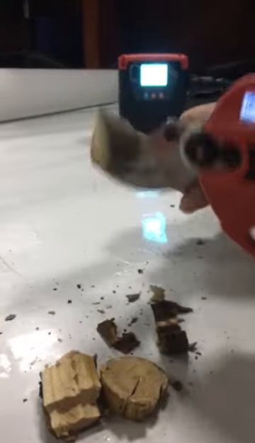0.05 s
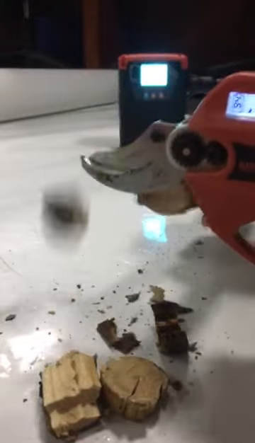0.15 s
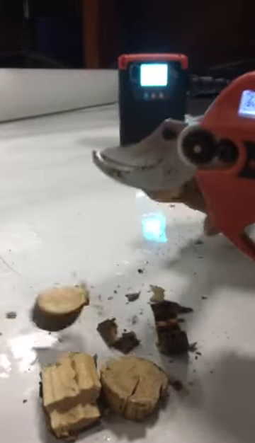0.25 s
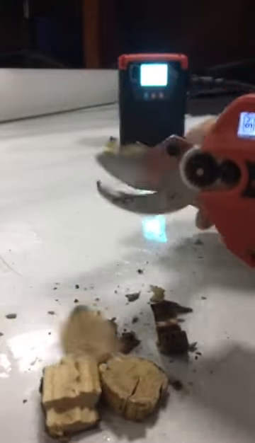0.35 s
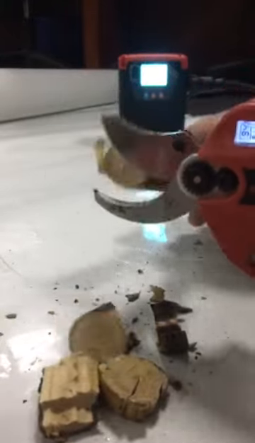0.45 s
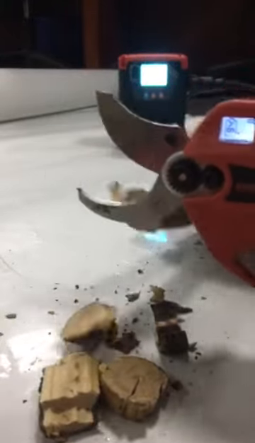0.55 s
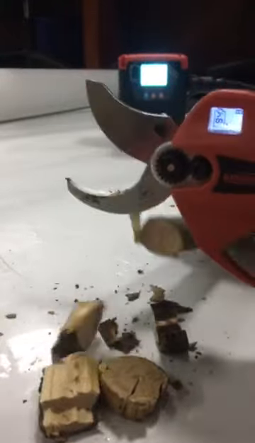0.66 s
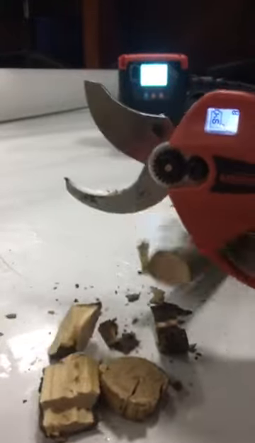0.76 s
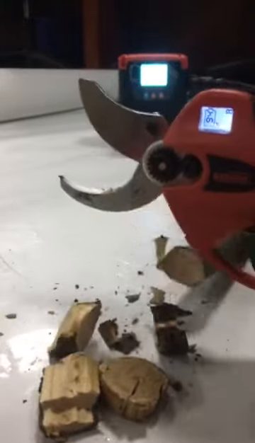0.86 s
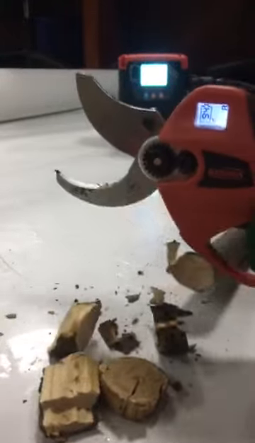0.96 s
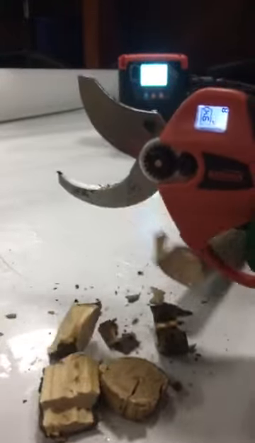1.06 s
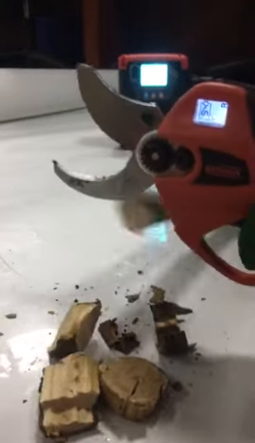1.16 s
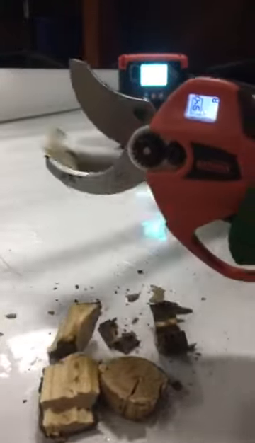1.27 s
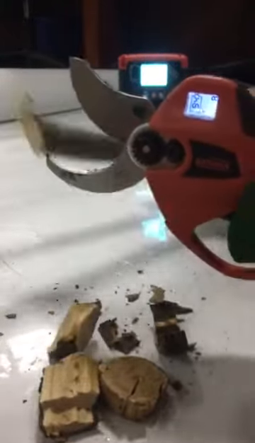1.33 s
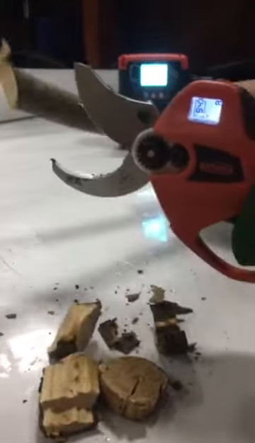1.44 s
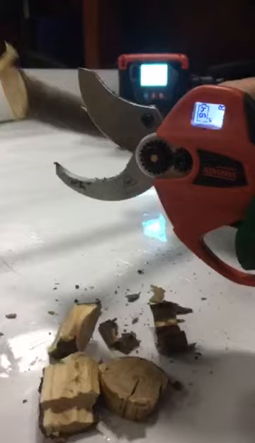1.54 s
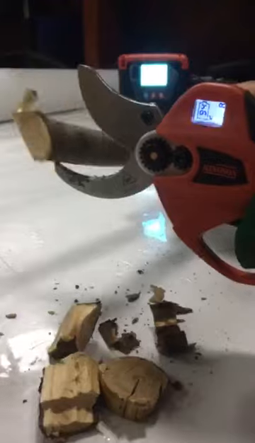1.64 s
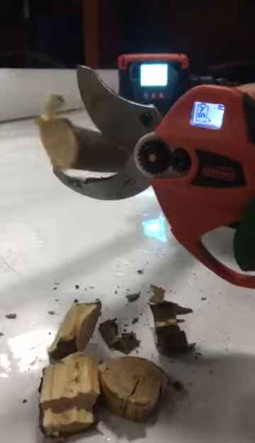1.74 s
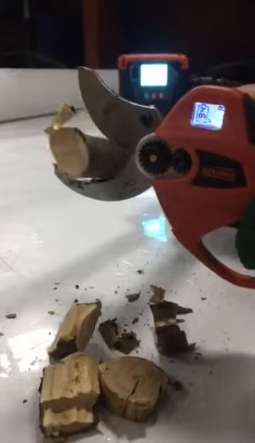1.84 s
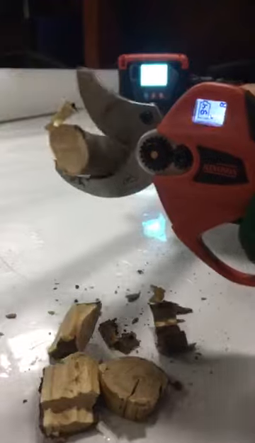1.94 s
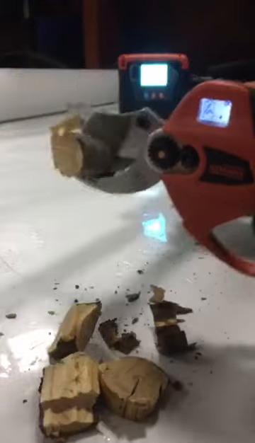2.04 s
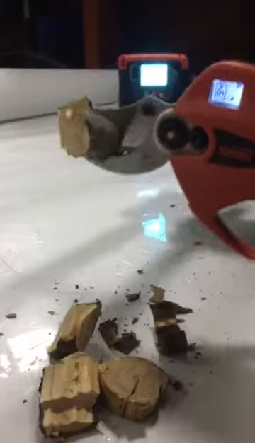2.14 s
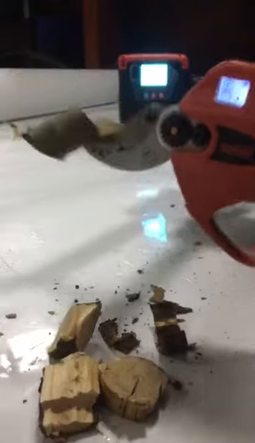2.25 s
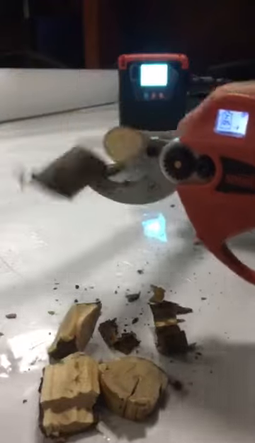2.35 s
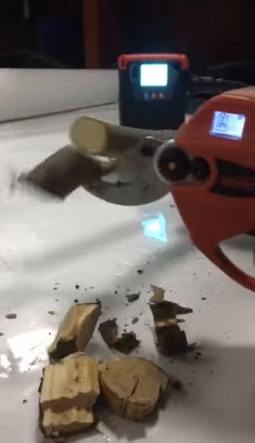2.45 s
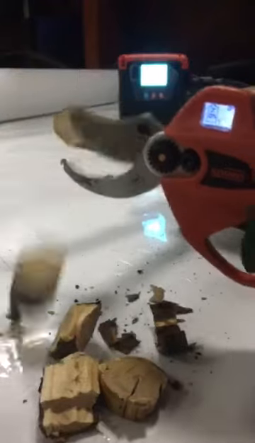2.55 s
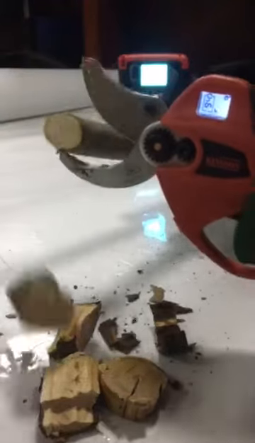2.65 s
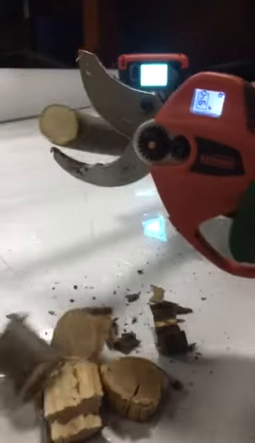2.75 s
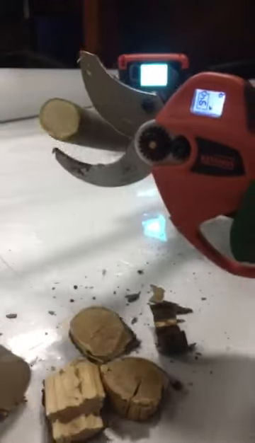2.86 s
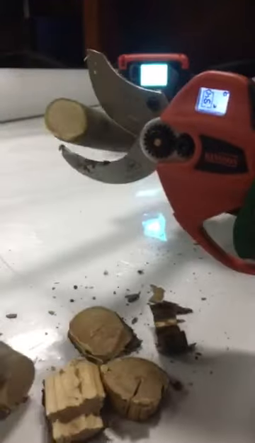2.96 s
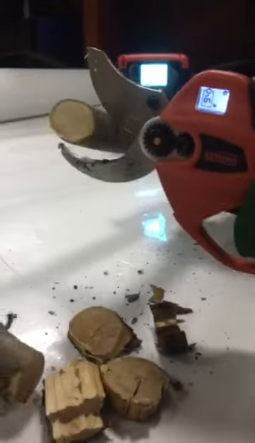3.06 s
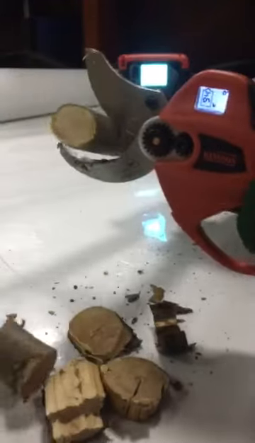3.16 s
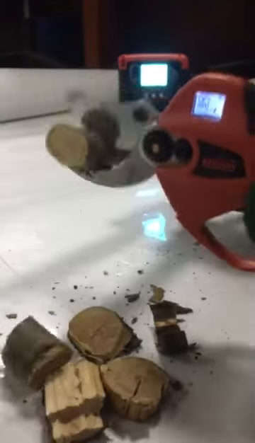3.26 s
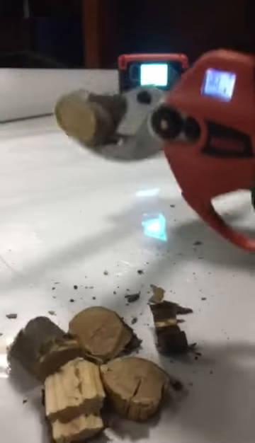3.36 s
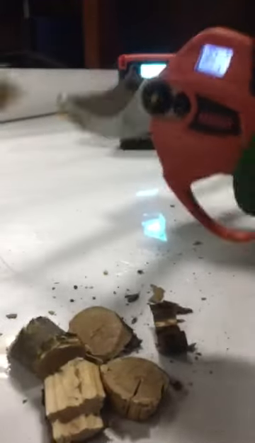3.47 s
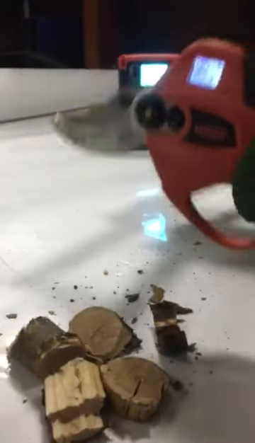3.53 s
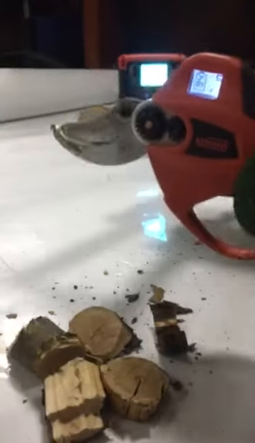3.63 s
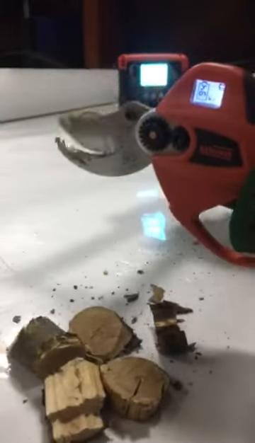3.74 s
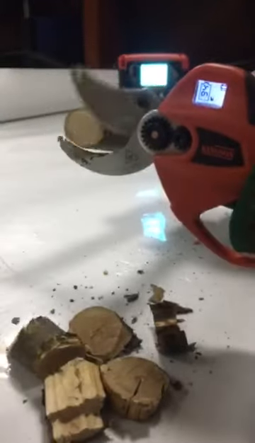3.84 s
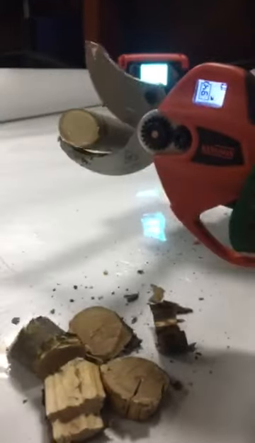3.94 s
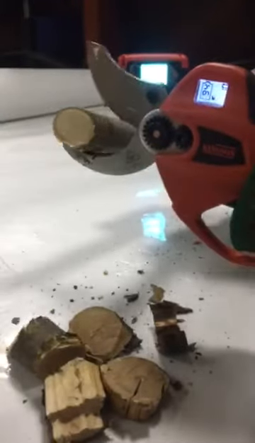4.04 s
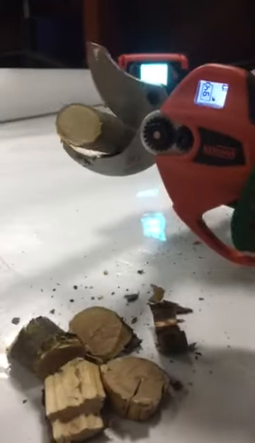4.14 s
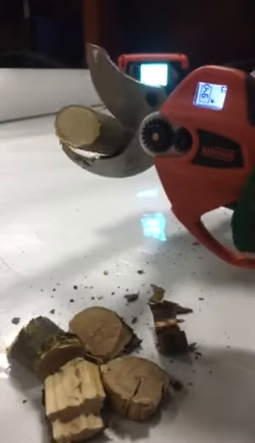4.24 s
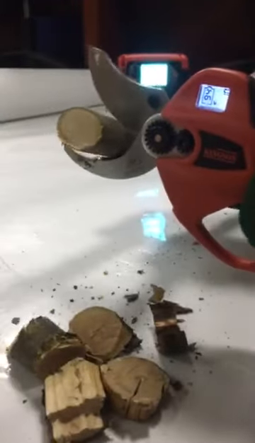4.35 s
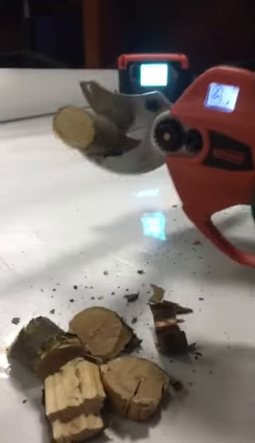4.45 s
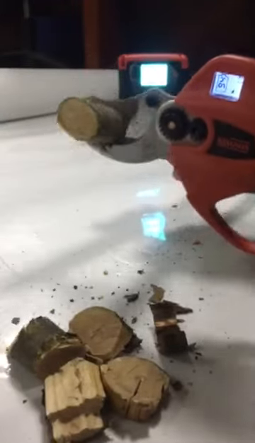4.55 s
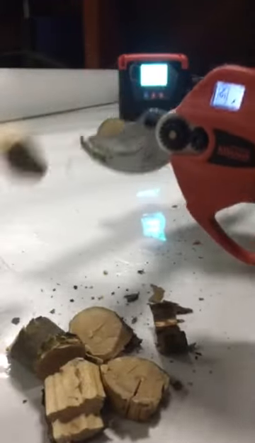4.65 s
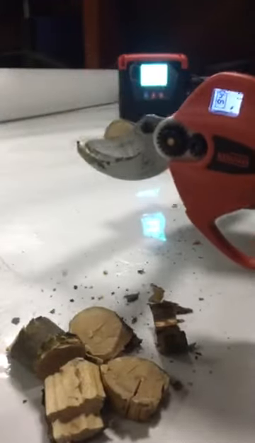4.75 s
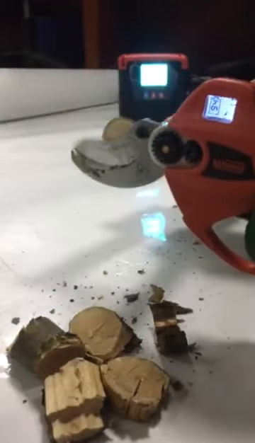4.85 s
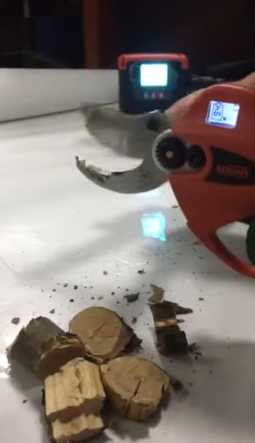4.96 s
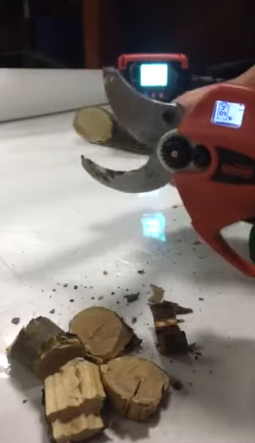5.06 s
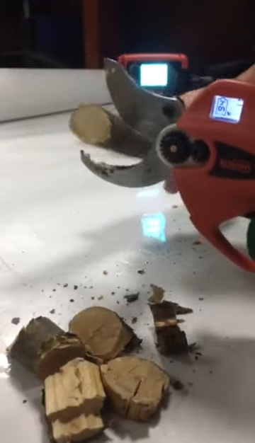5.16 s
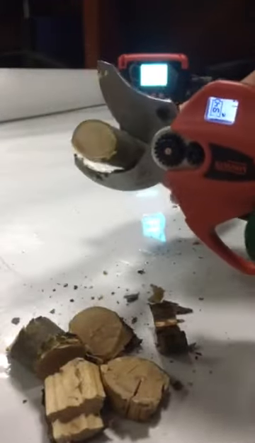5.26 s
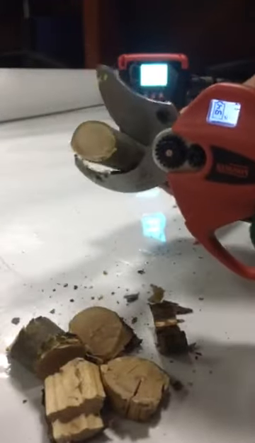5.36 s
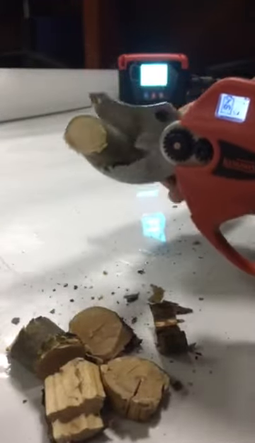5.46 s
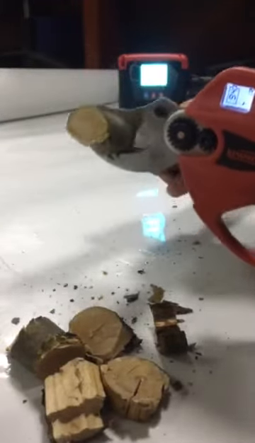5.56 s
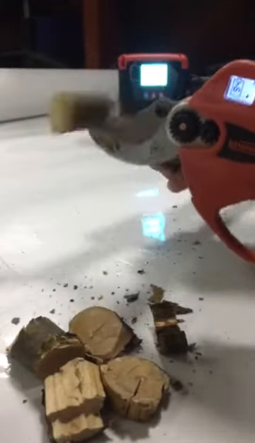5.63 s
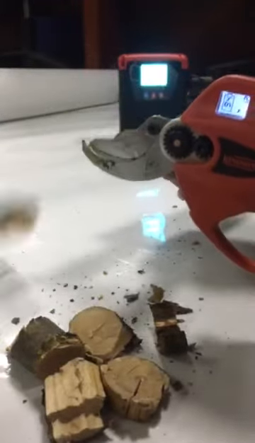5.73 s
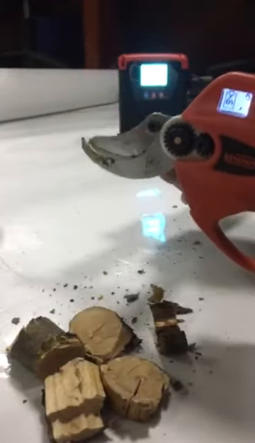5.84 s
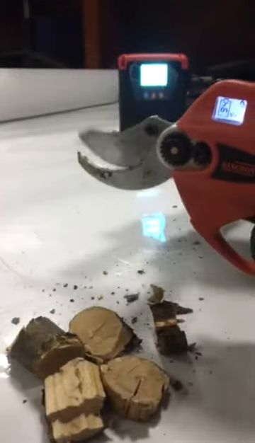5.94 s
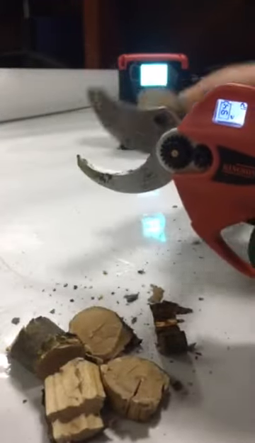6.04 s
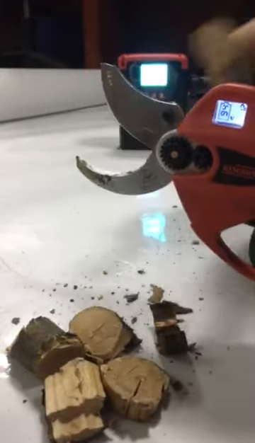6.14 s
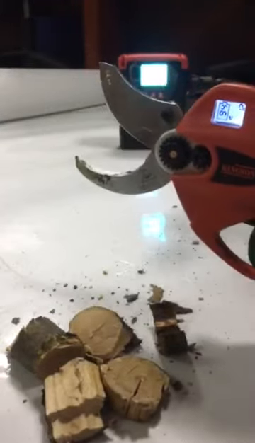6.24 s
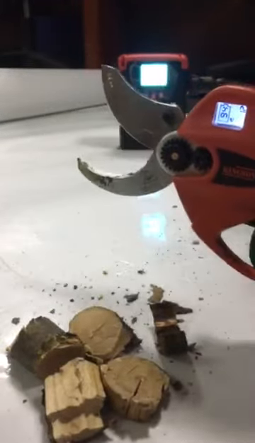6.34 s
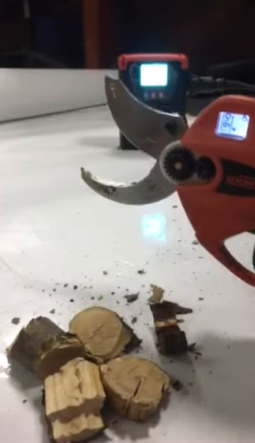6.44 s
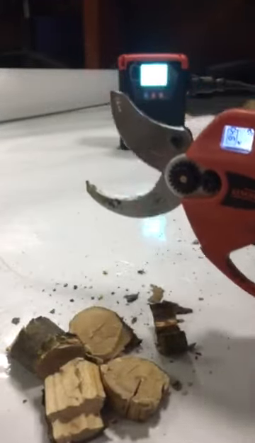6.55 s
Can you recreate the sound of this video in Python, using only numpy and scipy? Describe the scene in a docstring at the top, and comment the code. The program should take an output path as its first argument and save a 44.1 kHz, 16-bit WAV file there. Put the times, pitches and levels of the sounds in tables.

```python
"""In a small room, close by over a table, a battery pruning shear snips five pieces off a branch.
The motor's speed drives gear tones, grinding and rattle: it whirs up, sags as the blade bites, races as wood snaps.
The first cut is already under way. After each cut the blade runs open unloaded.
Noise bursts make the snaps, splinters and ticks; ringing modes make the gear kicks and offcuts knocking on the table.
The bark rubs in the hand, and a low hum and room noise lie under it all; a deep drone fades out early."""
import sys
import numpy as np
from scipy import signal
from scipy.fft import rfft, irfft
from scipy.io import wavfile
from scipy.ndimage import uniform_filter1d

SR = 44100
rng = np.random.default_rng(int(sys.argv[2]) if len(sys.argv) > 2 else 0)


def generate_wav(sig):
    """Save sig (samples, or channels by samples) to the path in sys.argv[1] as 16-bit PCM at SR."""
    pcm = np.round(np.clip(np.atleast_2d(sig).T, -1, 1) * 32767).astype(np.int16)
    wavfile.write(sys.argv[1], SR, pcm)


N = 291060
TIME = np.arange(N) / SR

# Room background. Each row: frequency in Hz, relative level in dB per Hz.
AIR_SPECTRUM = [(18, -37), (30, -10), (59, -4), (100, -9.5), (137, -16.5), (191, -13), (403, -28.5),
                (446, -22), (482, -28), (728, -25.5), (786, -30.5), (1070, -22.5), (2040, -37.5),
                (10300, -56), (14000, -49.5)]
# How long the room echoes. Each row: frequency in Hz, time to fall by 60 dB in seconds.
ROOM_DECAY = [(200, 1), (1500, 0.53), (5000, 0.53), (12000, 0.26)]
# Closing strokes. Each row: start in seconds (below 0 means already running), run-up in seconds,
# top tooth-meeting rate in Hz, time to sag in seconds, rate under load in Hz, rate gained by racing in Hz,
# moment the wood gives way in seconds, then relative levels in dB of the whine, the grinding and the snap.
CLOSING_STROKES = [(-.25, 0.3, 2104, 0.054, 1387, 276, .1211, -32.5, -23, -7),
                   (1.9774, 0.098, 2985, 0.12, 1556, 626, 2.2932, -31.5, -24.5, -7),
                   (3.2362, 0.092, 3019, 0.13, 1594, 540, 3.5423, -29, -24.5, -8),
                   (4.3983, .078, 3113, .118, 1790, 599, 4.6793, -31.5, -24.5, -8.5),
                   (5.4234, 0.084, 3087, 0.12, 1678, 414.6, 5.7179, -30, -24.5, -6.5)]
# Opening strokes. Each row: start in seconds, level of the gear kick in dB.
OPENING_STROKES = [(.365, -30.5), (2.5222, -28), (3.749, -28), (4.9113, -28), (5.9531, -26.5)]
# Tones of the loaded gears: cycles per motor turn, one per tone.
LOADED_TONE_ORDERS = [5, 10.847, 12, 21.694, 22.85, 28, 32.541, 43.388, 54.235]
# Relative level in dB of each of those tones, in the same order.
LOADED_TONE_LEVELS = [-24.5, -3.5, -10, -4.5, -21, -17.5, -7.5, -15.5, -8]
# Tones of the free-running drive. Each row: cycles per motor turn, level in dB at full speed.
FREE_RUNNING_TONES = [(4, -47), (5, -40), (6, -44), (10.847, -53), (11, -48), (12, -41.5), (16, -51),
                      (19, -52), (21.23, -48), (21.694, -42), (24, -54), (28, -40.5)]
# How well the housing passes on gear tones. Each row: frequency in Hz, gain in dB.
HOUSING_RESPONSE = [(500, -18), (1100, -4), (1620, 8), (2100, -1.5), (2800, 0), (3600, 0.5), (4500, 0),
                    (5600, 2.5), (7000, -5.5), (9500, -9), (12000, -9), (14000, -10.5)]
# Grinding of the loaded gears. Each row: frequency in Hz, relative level in dB per Hz.
GRIND_SPECTRUM = [(210, -57), (350, -32.5), (639, -10), (805, -22), (954, -13.5), (1720, -4.5), (2100, -10),
                  (2770, -6.5), (4200, -7), (5460, -9), (6570, -14), (7100, -10), (10300, -19),
                  (11800, -9.5), (14000, -23)]
# Rattle of the unloaded gears. Each row: frequency in Hz, relative level in dB per Hz.
FREE_RATTLE_SPECTRUM = [(240, -29.5), (400, -16.5), (1050, -15.5), (1130, -16.5), (1300, -33), (1420, -2),
                        (1850, -9), (3360, -7), (4260, -7), (6090, -5), (7610, -9), (8320, -6),
                        (9090, -11.5), (12400, -12), (14000, -28.5)]
# Ringing of the gearbox. Each row: frequency in Hz, relative level in dB, time to fall by 60 dB in seconds.
GEARBOX_MODES = [(1404, -6, 0.031), (1750, -3.5, 0.0071), (2416, -4, 0.025), (2840, -12.5, 0.0021),
                 (4170, -4, 0.0042), (5480, -6, 0.015), (7630, 2.5, 0.0051), (9110, -2.5, 0.0045),
                 (12540, -22.5, .002)]
# Colour of breaking wood. Each row: frequency in Hz, relative level in dB per Hz.
SNAP_SPECTRUM = [(180, -37.5), (300, -8), (2390, -3), (3630, -7.5), (5780, -7), (6470, -9), (7010, -4.5),
                 (8780, -4), (10300, -5), (11900, -4.5), (14000, -12.5)]
# Fibres splitting under the blade. Each row: time in seconds, relative level in dB.
FIBRE_SPLITS = [(0.1113, -18), (2.1985, -18.5), (2.2701, -16), (2.281, -16), (2.2962, -11.5),
                (3.527, -12.5), (4.6653, -15), (5.6307, -12.5), (5.701, -14.5)]
# Offcuts knocking on the table. Each row: time in seconds, relative level of the thud in dB,
# level of the deep thump in dB, relative level of the click in dB.
OFFCUT_KNOCKS = [(0.3259, -27, -51, -19.5), (0.3376, -14.5, -37, -12), (0.942, -28, -49, -50),
                 (0.957, -29.5, -45.5, -59), (2.6833, -17.5, -49, -15), (2.8331, -22, -60.5, -20),
                 (3.744, -17.5, -29.5, -25), (3.755, -18.5, -43, -38), (4.8576, -14, -42.5, -21.5),
                 (4.862, -11, -34, -33.5), (5.327, -38, -57.5, -41), (5.9009, -16, -38.5, -21.5),
                 (6.159, -19, -49, -40), (6.2751, -28, -47, -37)]
# Ringing of table and offcut. Each row: typical frequency in Hz, typical relative level in dB,
# time to fall by 60 dB in seconds.
TABLE_MODES = [(282, -9.5, 0.038), (395, -5.5, 0.031), (485, -5, 0.027), (627, -6, 0.024),
               (774, -10.5, 0.023), (1060, -11, .016)]
# The whole table top flexing. Each row: frequency in Hz, relative level in dB, time to fall by 60 dB in seconds.
TABLE_FLEX_MODES = [(123, -5.5, 0.092), (206, -0.5, 0.087)]
# Light contacts of chips, branch and tool. Each row: time in seconds, relative level in dB.
LIGHT_TICKS = [(0.7712, -37), (0.8437, -30), (0.8892, -36.5), (1.002, -35.5), (1.1148, -40), (1.828, -52.5),
               (2.8242, -28), (2.8685, -32.5), (2.9096, -29.5), (3.067, -40), (4.853, -33), (5.2244, -38.5)]
# Colour of light contacts and rubbing bark. Each row: frequency in Hz, relative level in dB per Hz.
TICK_SPECTRUM = [(290, -39), (500, -2.5), (1480, -0.5), (2860, 2), (4220, -10), (6410, -10.5),
                 (7580, -25.5), (8840, -14), (10000, -17.5), (14000, -33.5)]

# the room noise, the hum, and a deep drone that dies away early on
AIR_DB, HUM_HZ, HUM_DB = -51.5, 54, -59
DRONE_DB, DRONE_HOLD_S, DRONE_FADE_DB_PER_S, DRONE_HZ = -46.5, 0.39, 80, 64.5
# gear teeth meet this often per motor turn; the rattle above this frequency changes with speed
MESH_PER_TURN, RATTLE_TOP_HZ = 10.847, 10600
# the motor: pause after the kick, braking of the tooth-meeting rate, rate at which the gears sound fully
START_LAG_S, BRAKE_HZ_PER_S, ENGAGED_HZ = .013, 30500, 1550
# the gears sing out as the edge bites: time after the start, width, gain
BITE_S, BITE_WIDTH_S, BITE_DB = 0.14, .019, 13.5
# full load makes the gears louder, braking quieter; grinding grows with speed
LOAD_WHINE_DB, LOAD_GRIND_DB, BRAKING_WHINE_DB, BRAKING_GRIND_DB, GRIND_DB_PER_OCTAVE = 4, 3.5, -7, -2.5, 5.5
# the motor races as the last fibres give way, and wavers in the uneven wood (share of its loaded speed)
RACE_S, WAVER = .026, .015
# overtones relative to the mean of whine and grinding; rasp relative to the overtones
OVERTONE_DB, RASP_DB = 0.5, -6.5
# change of the overtones at the bite, while running up and while racing
BITE_OVERTONE_DB, RUN_UP_OVERTONE_DB, RACING_OVERTONE_DB = -5, -9, -4.5
# the unloaded opening stroke, always alike: run-up, start of braking, steady tooth-meeting rate
OPEN_RISE_S, OPEN_BRAKE_S, FREE_HZ = .086, .207, 3114
# the unloaded gears: rattle at steady speed, and the sweeping tone while speeding up and braking
FREE_RATTLE_DB, RUN_UP_SWEEP_DB, BRAKE_SWEEP_DB = -33.5, -38, -33
CLOSE_KICK_DB = -28.5
# the branch shifts in the hand: a swell, then a fade, with stray crumbs of bark
SHIFT_S, SHIFT_ATTACK_S, SHIFT_HOLD_S, SHIFT_RELEASE_S = .76, .07, .43, .15
RUSTLE_DB, RUSTLE_FADE_DB_PER_S = -54, 29.5
CRUMBS_PER_S, LOUDEST_CRUMB_DB = 12, -55


def from_db(db):
    """Turn decibels into gain."""
    return 10 ** (np.asarray(db) / 20)


def rms_one(x):
    """Scale a sound to an average (rms) strength of 1."""
    return x / np.sqrt(np.mean(x ** 2) + 1e-20)


def at_hz(points, hz):
    """Read a curve between its points, on a log-frequency axis."""
    f, value = np.transpose(points)
    return np.interp(np.log(np.maximum(hz, 1)), np.log(f), value)


def add(out, s, sound):
    """Mix a sound in at time s; it may have begun before the start."""
    i = round(s * SR)
    sound, i = sound[max(-i, 0):], max(i, 0)
    out[i:i + len(sound)] += sound[:N - i]


def noise(spectrum, size):
    """Coloured noise of unit rms, falling steeply below its lowest point."""
    hz = np.fft.rfftfreq(size, 1 / SR)
    gain = from_db(at_hz(spectrum, hz)) * np.minimum(hz / spectrum[0][0], 1) ** 2
    white = rng.standard_normal(size)
    return rms_one(irfft(rfft(white) * gain, size))


def drift(rate, t):
    """Wander at random around 0, with a new target (spread 1) rate times a second."""
    return np.interp(t * rate, np.arange(4096), rng.standard_normal(4096))


def ease(t, length_s):
    """Rise from 0 to 1 along a quarter sine."""
    return np.sin(np.pi / 2 * np.clip(t / length_s, 0, 1))


def ring(force, modes):
    """Let a force strike fading resonances, their signs alternating."""
    out = 0
    for k, (hz, db, t60) in enumerate(modes):
        r = from_db(-60 / (t60 * SR))  # loss per sample
        w = 2 * np.pi * hz / SR
        mode = signal.lfilter([0, np.sin(w)], [1, -2 * r * np.cos(w), r * r], force + 1e-18)
        out = out + (-1) ** k * from_db(db) * mode
    return out


def background():
    """Room rumble as coloured noise, a hum of wavering level and pitch, and a drone that fades away."""
    hum_gain = from_db(HUM_DB + 2 * drift(9, TIME))
    hum = hum_gain * np.sin(2 * np.pi * HUM_HZ * TIME + .9 * drift(7, TIME))
    drone_db = DRONE_DB - DRONE_FADE_DB_PER_S * np.maximum(TIME - DRONE_HOLD_S, 0)
    drone = from_db(drone_db) * np.sin(2 * np.pi * DRONE_HZ * TIME)
    return from_db(AIR_DB) * noise(AIR_SPECTRUM, N) + np.sqrt(2) * (hum + drone)


def motor(t, rise_s, top_hz, brake_s, load_hz=0):
    """Tooth-meeting rate: the motor runs up, is held back by load and brakes evenly; inertia rounds corners."""
    hz = top_hz * ease(t - START_LAG_S, rise_s) - load_hz - BRAKE_HZ_PER_S * np.maximum(t - brake_s, 0)
    return uniform_filter1d(np.maximum(hz, 100), size=500)


def gear_tones(mesh_hz, t, tones, response, wobble, flutter_db):
    """Tones locked to the motor's turning, coloured by a response curve as they glide."""
    turn_hz = mesh_hz / MESH_PER_TURN * (1 + wobble * drift(400, t))
    turns = np.cumsum(turn_hz) / SR
    out = 0
    for order, db in tones:
        gain = from_db(db + at_hz(response, order * turn_hz) + flutter_db * drift(450, t))
        out = out + gain * np.sin(2 * np.pi * (order * turns + rng.random()))
    return np.sqrt(2) * out


def gear_rattle(mesh_hz, t, spectrum, throb, grain_db):
    """Teeth rub and clatter unevenly, swelling once in every motor turn; faster teeth sound brighter."""
    turns = np.cumsum(mesh_hz / MESH_PER_TURN) / SR
    contact = (1 + throb * np.cos(2 * np.pi * turns)) * from_db(grain_db * drift(1500, t))
    rattle = noise(spectrum, len(t))
    top_filter = signal.butter(4, RATTLE_TOP_HZ, "high", fs=SR, output="sos")
    top = signal.sosfiltfilt(top_filter, rattle)
    brightness = np.clip(mesh_hz / 2300, .3, 1.15)
    return rms_one((rattle + (brightness - 1) * top) * contact)


def drive_whistle(mesh_hz, t):
    """The motor's switching whistle slides down as the speed rises."""
    hz = 10200 - .4 * mesh_hz + 90 * drift(700, t)
    gain = signal.windows.tukey(len(t), .1) * from_db(4 * drift(300, t))
    return gain * np.sin(2 * np.pi * np.cumsum(hz) / SR)


def closing():
    """The loaded gears sing and grind: the wood drags the motor down until it gives way."""
    out = np.zeros(N)
    tones = list(zip(LOADED_TONE_ORDERS, LOADED_TONE_LEVELS))
    for s, rise_s, top_hz, sag_s, loaded_hz, race_hz, snap_s, whine_db, grind_db, _ in CLOSING_STROKES:
        through_s = snap_s - s
        t = np.arange(0, through_s + (loaded_hz + race_hz) / BRAKE_HZ_PER_S, 1 / SR)

        # how far each phase has come, from 0 to 1
        sag = ease(t - START_LAG_S - rise_s, sag_s) ** 2
        freed = np.clip((t - through_s) / RACE_S + 1, 0, 1)
        load, braking = sag * (1 - freed), ease(t - through_s, .012)
        running_up = 1 - ease(t - START_LAG_S, rise_s)
        bite = np.exp(-.5 * ((t - BITE_S) / BITE_WIDTH_S) ** 2)

        slowing_hz = sag * (top_hz - loaded_hz * (1 + WAVER * drift(60, t)))
        mesh_hz = motor(t, rise_s, top_hz, through_s + .004, slowing_hz - freed * race_hz)
        moving = np.minimum(mesh_hz / ENGAGED_HZ, 1)

        whine_db = whine_db + BITE_DB * bite + LOAD_WHINE_DB * load + BRAKING_WHINE_DB * braking
        octaves = np.log2(np.maximum(mesh_hz, ENGAGED_HZ) / FREE_HZ)
        grind_db = grind_db + GRIND_DB_PER_OCTAVE * octaves
        grind_db = grind_db + LOAD_GRIND_DB * load + BRAKING_GRIND_DB * braking
        overtone_db = (whine_db + grind_db) / 2 + OVERTONE_DB + BITE_OVERTONE_DB * bite
        overtone_db = overtone_db + RUN_UP_OVERTONE_DB * running_up + RACING_OVERTONE_DB * freed

        # the low tones follow the whine; the overtones also follow how hard the teeth grind
        low = gear_tones(mesh_hz, t, tones[:3], HOUSING_RESPONSE, wobble=.013, flutter_db=2.5)
        low = from_db(whine_db - 2) * low
        high = gear_tones(mesh_hz, t, tones[3:], HOUSING_RESPONSE, wobble=.009, flutter_db=4)
        high = from_db(overtone_db) * high
        # teeth bouncing in their slack smear each tone into a rasping band
        rasp = gear_tones(mesh_hz, t, tones, HOUSING_RESPONSE, wobble=.045, flutter_db=3.5)
        rasp = from_db(overtone_db + RASP_DB) * rasp
        grind = gear_rattle(mesh_hz, t, GRIND_SPECTRUM, throb=.25, grain_db=3.0)
        grind = from_db(grind_db - 3 + 1.5 * drift(110, t)) * grind
        whistle = from_db(-46) * (1 - moving) * drive_whistle(mesh_hz, t)
        add(out, s, moving ** 2 * low + moving ** 4 * (high + rasp) + moving * grind + whistle)
    return out


def cracks(events, spectrum, decay_s, tail_db, tail_s):
    """A sharp noise burst of breaking or colliding wood with a short splintery tail."""
    out, t = np.zeros(N), TIME[:SR // 10]
    for s, db in events:
        tail = from_db(tail_db + 1.1 * drift(1400, t)) * np.exp(-t / tail_s)
        burst = noise(spectrum, len(t)) * (np.exp(-t / decay_s) + tail)
        add(out, s, from_db(db) * burst / np.std(burst[:SR // 500]))  # level set over the first 2 ms
    return out


def knocks(events, contact_s, scuff_db):
    """A blunt push and a brief scuff of bark set the table ringing, a little differently each time."""
    out, t = np.zeros(N), TIME[:SR // 5]
    for s, db, thump_db, _ in events:
        modes = [(hz * (1 + .04 * rng.normal()), level + rng.normal(), t60) for hz, level, t60 in TABLE_MODES]
        scuff = from_db(scuff_db) * rng.standard_normal(len(t)) * np.exp(-t / .007)
        force = np.exp(-t / contact_s) + scuff
        thud, thump = ring(force, modes), ring(force, TABLE_FLEX_MODES)
        thud = from_db(db) * thud / np.abs(thud).max()
        # 9 dB up makes good the 9 dB by which scene() lowers the knocks
        thump = from_db(thump_db + 9) * thump / np.abs(thump).max()
        add(out, s, thud + thump)
    return out


def opening():
    """The free motor ramps up to a steady speed, holds it and brakes."""
    out, t = np.zeros(N), np.arange(0, OPEN_BRAKE_S + FREE_HZ / BRAKE_HZ_PER_S, 1 / SR)
    mesh_hz = motor(t, OPEN_RISE_S, FREE_HZ, OPEN_BRAKE_S)
    speed, moving = mesh_hz / FREE_HZ, np.minimum(mesh_hz / ENGAGED_HZ, 1)
    # speeding up and braking load the teeth: the twelfth order and the rattle stand out
    ramping = np.clip((1 - speed) * 7, 0, 1)
    sweep_db = np.where(t > OPEN_BRAKE_S, BRAKE_SWEEP_DB, RUN_UP_SWEEP_DB)
    free_response = [(400, -15), (1000, 0)]  # Hz, dB
    for s, _ in OPENING_STROKES:
        tones = gear_tones(mesh_hz, t, FREE_RUNNING_TONES, free_response, wobble=.0008, flutter_db=1.2)
        tones = speed ** 2 * tones
        sweep = gear_tones(mesh_hz, t, [(12, 0)], HOUSING_RESPONSE, wobble=.018, flutter_db=3)
        sweep = ramping * from_db(sweep_db) * sweep
        rattle = gear_rattle(mesh_hz, t, FREE_RATTLE_SPECTRUM, throb=0.12, grain_db=2.5)
        rattle = from_db(FREE_RATTLE_DB + 2 * ramping) * rattle
        whistle = from_db(-48) * ramping * drive_whistle(mesh_hz, t)
        add(out, s, moving ** 1.3 * (tones + sweep + rattle) + whistle)
    return out


def kicks(chatter_s):
    """At each start the gears chatter through their slack, then rub as they take up the load."""
    out, t = np.zeros(N), TIME[:SR // 10]
    starts = [(stroke[0], CLOSE_KICK_DB) for stroke in CLOSING_STROKES] + OPENING_STROKES
    for s, db in starts:
        force = rng.standard_normal(len(t)) * (np.exp(-(t / chatter_s) ** 4) + 0.13 * np.exp(-t / 0.11))
        chatter = ring(force, GEARBOX_MODES)
        chatter = chatter / np.std(chatter[:round(chatter_s * SR)])
        rub_fade = 0.25 * np.exp(-t / chatter_s) + 0.13 * np.exp(-t / .03)
        rub = noise(FREE_RATTLE_SPECTRUM, len(t)) * rub_fade
        add(out, s, from_db(db) * (chatter + rub))
    return out


def handling():
    """Bark rubs and crumbles in the hand: fluttering noise with small random cracks."""
    t = TIME - SHIFT_S
    release = ease(t - SHIFT_ATTACK_S - SHIFT_HOLD_S, SHIFT_RELEASE_S)
    held = ease(t, SHIFT_ATTACK_S) * (1 - release)
    rub_db = RUSTLE_DB - RUSTLE_FADE_DB_PER_S * t + 3.5 * drift(150, TIME)
    rub = from_db(rub_db) * noise(TICK_SPECTRUM, N)
    draws = rng.random((round(CRUMBS_PER_S * SHIFT_HOLD_S), 2))
    first_s = SHIFT_S + SHIFT_ATTACK_S
    crumbs = [(first_s + SHIFT_HOLD_S * when, LOUDEST_CRUMB_DB - 6 * softness) for when, softness in draws]
    return held * (rub + cracks(crumbs, TICK_SPECTRUM, decay_s=.0014, tail_db=-17, tail_s=.008))


def room(x, wet_db):
    """Echoes blur into a diffuse noise tail that dies away band by band."""
    t, tail = TIME[:SR * 3 // 4], 0
    edges = np.geomspace(100, 15000, 8)
    for low, high in zip(edges, edges[1:]):
        band_filter = signal.butter(2, [low, high], "band", fs=SR, output="sos")
        band = signal.sosfilt(band_filter, rng.standard_normal(len(t)))
        decay_db = -60 * t / at_hz(ROOM_DECAY, np.sqrt(low * high))
        tail = tail + band * from_db(decay_db)
    tail = tail * np.minimum(t / 0.0068, 1)  # the tail builds up gradually
    return from_db(wet_db) * signal.fftconvolve(x, tail / np.linalg.norm(tail))[:N]


def scene():
    """Mix shear, wood and table, then add the room's tail and background."""
    shear = closing() + opening() + kicks(chatter_s=0.0083)
    snaps = [(snap_s, snap_db) for *_, snap_s, _, _, snap_db in CLOSING_STROKES]
    clicks = [(s, click_db) for s, _, _, click_db in OFFCUT_KNOCKS]
    splitting = cracks(snaps + FIBRE_SPLITS, SNAP_SPECTRUM, decay_s=.002, tail_db=-16, tail_s=.009)
    contacts = cracks(clicks + LIGHT_TICKS, TICK_SPECTRUM, decay_s=.0014, tail_db=-17, tail_s=.008)
    thuds = knocks(OFFCUT_KNOCKS, contact_s=0.00027, scuff_db=-3.5)
    wood = from_db(-6.5) * splitting + from_db(-8.0) * contacts + from_db(-9) * thuds
    dry = shear + wood + handling()
    return (dry + room(dry, wet_db=-17.5) + background())[None]


def record(dry):
    """Cut the deepest bass and the very top steeply."""
    bass_cut = signal.butter(4, 39, "high", fs=SR, output="sos")
    top_cut = signal.ellip(10, .1, 80, 14000, fs=SR, output="sos")
    return signal.sosfilt(top_cut, signal.sosfilt(bass_cut, dry))


dry = scene()
out = record(dry)
generate_wav(out)
```